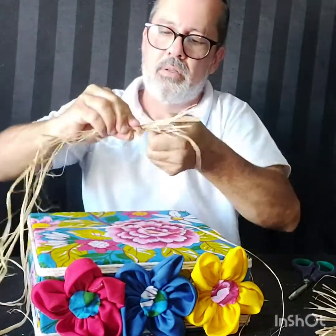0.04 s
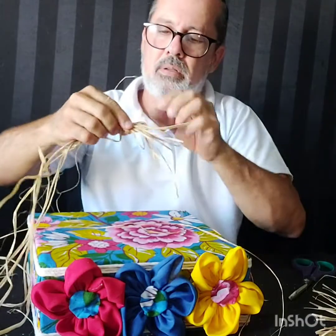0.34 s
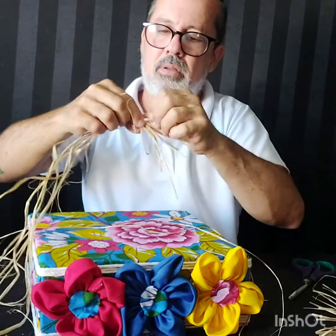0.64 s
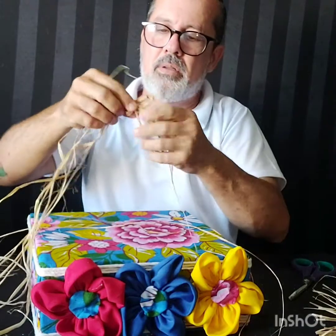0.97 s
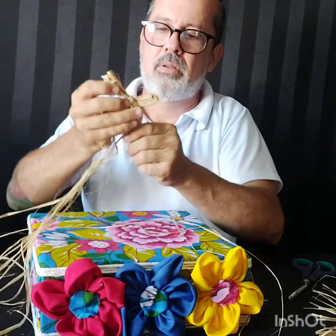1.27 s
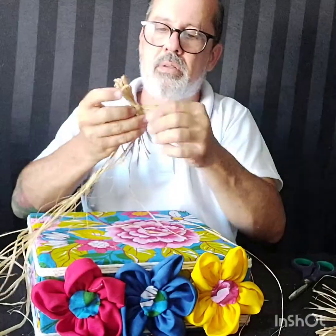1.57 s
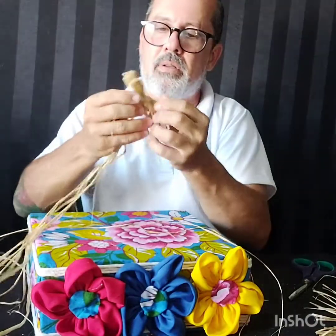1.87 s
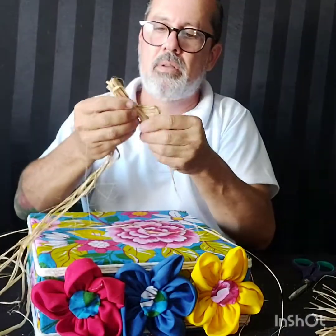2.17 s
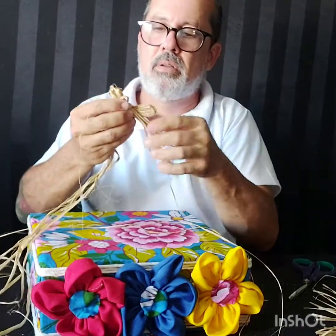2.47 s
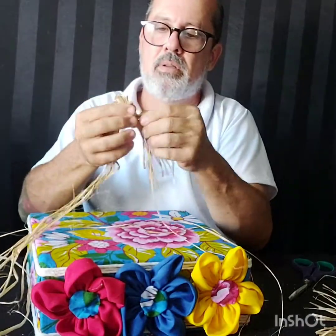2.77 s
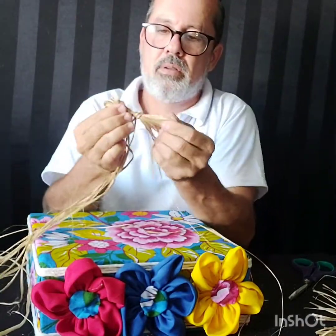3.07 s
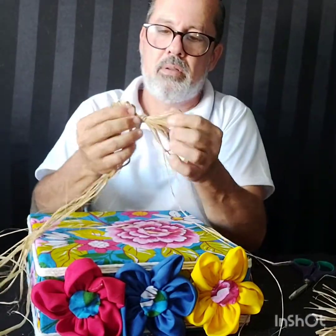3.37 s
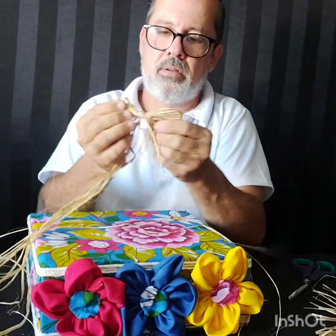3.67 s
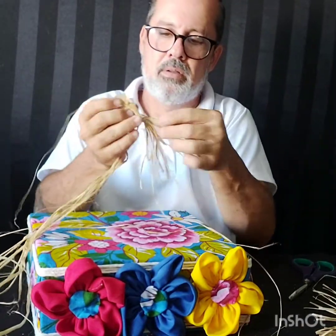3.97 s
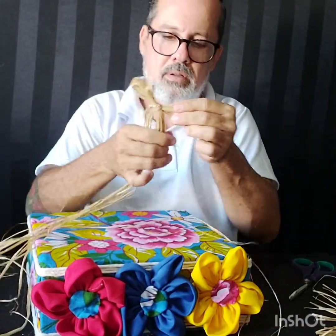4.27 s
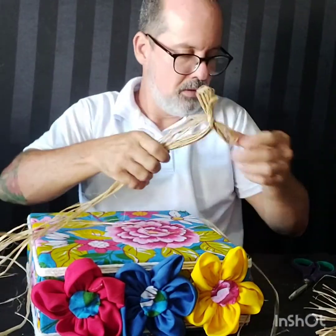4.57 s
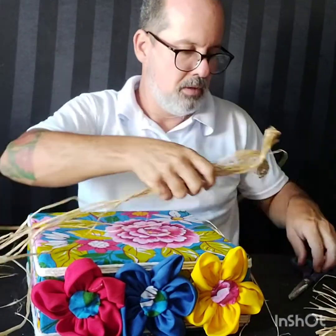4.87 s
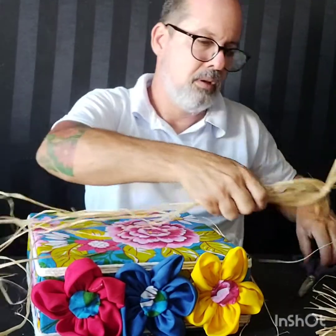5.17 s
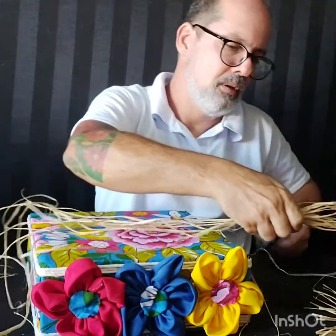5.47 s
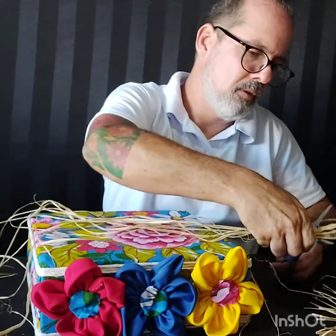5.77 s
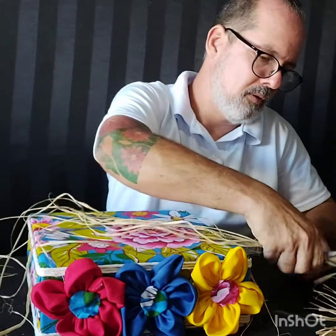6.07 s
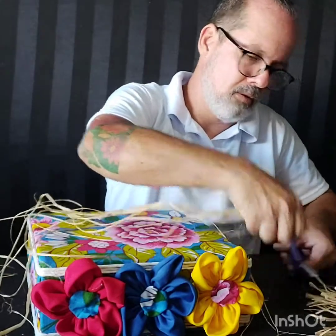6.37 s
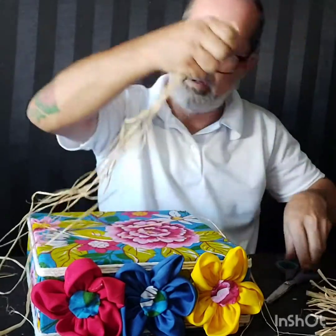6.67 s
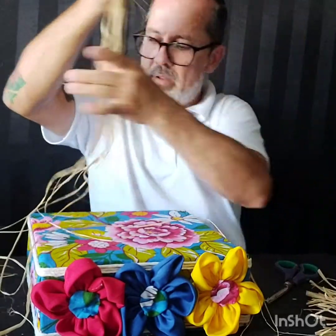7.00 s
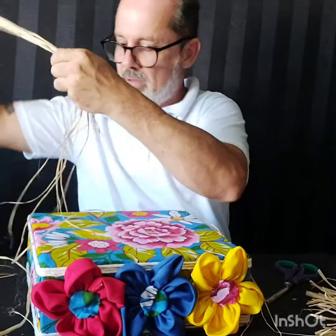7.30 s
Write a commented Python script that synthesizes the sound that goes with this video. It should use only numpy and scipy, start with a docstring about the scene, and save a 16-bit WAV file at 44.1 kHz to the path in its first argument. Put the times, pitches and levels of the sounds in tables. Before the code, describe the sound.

Hands work dry raffia close by in a quiet room, over a faint hiss and a steady low rumble of traffic outside. From the start, the fibres crinkle and rub in short, faint, irregular bursts, dotted with tiny high snaps. A distant engine swells softly around 1.3 seconds and again near 4.9, with a low street drone between about 3 and 4 seconds. Around 5 seconds, three soft knocks sound on the table and the bundle scrapes lightly across a box. At 6 seconds the snaps grow louder as scissors crunch through the fibres, clicking shut at 6.2. A dull thud follows at 6.4. At about 6.6 the scissors are put down hard, the loudest sound, and the table top rings briefly. Everything dips in level for a moment, then recovers as the raffia rustles again from 7 seconds to the end.

```python
"""A quiet room, traffic rumbling outside. Hands tie a small bow in dry raffia: fibres crinkle, rub, snap.
A far engine swells at 1.3 s and 4.85 s, a low street drone in between. Near 5 s: soft knocks on the
table, and the bundle scrapes across a box. At 6.2 s scissors crush through it and click shut.
At 6.6 s they are put down hard and the table top rings; the gain control ducks, then recovers."""
import sys
import numpy as np
from scipy import signal
from scipy.fft import rfft, irfft, next_fast_len
from scipy.io import wavfile
from scipy.ndimage import uniform_filter1d, minimum_filter1d, map_coordinates

SR = 44100
rng = np.random.default_rng(int(sys.argv[2]) if len(sys.argv) > 2 else 0)


def waveform_to_disk(signal):
    """Save audio, clipped to [-1, 1], as 16-bit WAV at the path in sys.argv[1]."""
    frames = np.transpose(np.atleast_2d(signal))
    scaled = np.clip(frames, -1, 1) * 32767
    samples = np.round(scaled).astype(np.int16)
    wavfile.write(sys.argv[1], SR, samples)


N = 323694

# noise spectra: f/Hz, relative density/dB
RUMBLE_SPECTRUM = [(20, -19), (35, -11.5), (50, 0.5), (75, 0.5), (130, -3), (200, -8), (300, -8.5),
                   (450, -16), (700, -22.5), (1250, -25), (1800, -38.5), (3200, -47.5), (8000, -52.5)]
HISS_SPECTRUM = [(300, 7.5), (700, 11.5), (1200, 9), (1700, -1), (2300, -0.5), (3200, -11), (5000, -9.5),
                 (8000, -5), (11000, 0), (16000, -4.5)]
CRINKLE_SPECTRUM = [(1000, -32.5), (3000, -30), (4500, -8.5), (8000, -5), (9300, -1), (11500, 1),
                    (14000, -1), (16000, -7)]
RUB_SPECTRUM = [(300, -10.5), (700, -2.5), (1500, -3.5), (2300, 0), (3100, -2), (4000, 4), (6500, -1),
                (9000, -6), (15000, -21.5)]
BOARD_SPECTRUM = [(100, -28), (250, -3), (500, 1), (800, -4), (1150, -4.5), (1500, -9.5), (2100, -10),
                  (3600, -13), (5000, -19.5), (7000, -31.5), (15000, -26.5)]  # dense, fast-dying table modes
SLIDE_SPECTRUM = [(80, -11), (250, 5), (500, -7.5), (900, -12.5), (1400, -12), (2200, -26), (4000, -17),
                  (5800, -14.5), (7500, -24), (11000, -31)]
CRUNCH_SPECTRUM = [(250, -13.5), (600, -4), (1100, -13.5), (1600, -6), (2200, 0.5), (3200, -1.5), (4800, 0),
                   (6500, 3), (7600, -3), (12000, 2), (16000, -6.5)]
# left-right likeness: f/Hz, correlation
STREET_CORR = [(60, 0.95), (220, 0.89), (430, 0.68), (700, -0.19), (1100, -0.57), (2200, 0.41), (4000, 0)]
NEAR_CORR = [(250, 1), (800, 0.36), (2000, 0.24), (6000, -0.2), (15000, 0.025)]
TABLE_CORR = [(130, 0.93), (300, 0.92), (640, 0.25), (1400, 0.011), (7000, 0)]
# finger strokes: start/s, hold/s, crinkle level/dB, rub re crinkle/dB
STROKES = [ (0.0, 0.037, -51.5, -10), (.15, .05, -59.5, -12), (0.204, 0.008, -54, -9),
           (.32, 0.13, -69, -7.5), (.485, 0.085, -55, -12), (.61, .11, -51, -12), (.80, .15, -63.5, -10),
           (.97, .05, -58, -13), (1.04, 0.19, -55.5, -9.5), (1.214, 0.068, -56, -6),
           (1.335, 0.085, -54.5, -10.5), (1.60, .17, -56, -15.5), (1.855, 0.062, -56.5, -11),
           (2.015, .075, -61, -7.5), (2.16, 0.21, -56, -12), (2.435, .035, -57.5, -9),
           (2.5, .08, -68.5, -2), (2.611, 0.021, -54, -7), (2.745, 0.06, -53, -13), (2.889, 0.038, -49, -7),
           (3.06, 0.076, -55, -9), (3.17, 0.19, -62, -15.5), (3.338, .015, -56.5, -9.5),
           (3.425, 0.028, -55, -12.5), (3.52, .055, -57.5, -9.5), (3.679, 0.056, -51.5, -10),
           (3.815, .022, -57, -10.5), (4.015, .185, -58.3, -13.5), (4.22, 0.048, -52.5, -10.5),
           (4.345, 0.14, -52.5, -9.5), (4.55, 0.15, -58.5, -8), (4.77, 0.21, -58, -11.5),
           (5.05, .18, -56.5, -6), (5.27, .02, -65, 4.5), (5.33, .32, -68, -12), (5.70, 0.13, -55.5, -13),
           (5.89, 0.079, -62, -15), (5.985, .13, -53.5, -11.5), (6.385, .025, -63.5, -21),
           (6.435, 0.028, -69.5, 6), (6.72, 0.13, -66, -13), (7.02, .1, -60, -19), (7.135, .05, -50, -17),
           (7.2, 0.15, -46.5, -11), ]
# loudest fibre snaps, in the fingers, then the blades: t/s, level/dB, f/Hz
SNAPS = [(.521, -44, 12300), (.607, -48, 10200), (1.146, -46, 11200), (1.223, -38, 11700),
         (1.265, -42.5, 11000), (1.752, -46.5, 11900), (2.738, -48, 10000), (3.333, -41.5, 12800),
         (4.003, -46.5, 11690), (4.774, -44, 12930), (5.229, -41.5, 11780), (5.327, -49, 11000),
         (5.977, -43, 12000), (6.057, -39, 9500), (6.079, -35, 11540), (6.116, -30.5, 11800),
         (6.146, -30.5, 10900), (6.18, -31, 9000), (6.351, -55, 10800)]
# engine swells: peak t/s, 10 dB fade either side/s, level/dB
ENGINE_SWELLS = [(1.3, 0.84, -56), (4.85, 0.57, -57)]
# street drone: t/s, f/Hz, level/dB
DRONE_TRACK = [(2.6, 50.4, -76), (2.95, 48.86, -47), (3.2, 47, -45.5), (3.42, 47.6, -48.5),
               (3.52, 69.9, -53.5), (3.75, 72.9, -47.5), (3.92, 69.1, -61.5), (4.4, 69, -70)]
# knocks on the table: t/s, level/dB, contact cutoff/Hz
KNOCKS = [(4.897, -39.5, 200), (4.997, -42.5, 310), (5.225, -47, 350), (6.4222, -23.5, 305),
          (6.643, -3, 3670), (6.65, -16, 2500)]
# table top modes: f/Hz, level/dB, t60/s
TABLE_MODES = [(97, -34, .6), (149.3, -13, 0.24), (241.6, -12, .09), (307, -1.5, 0.08), (342.6, 3.5, 0.029),
               (428.6, -9, .09), (479.4, -6, .1), (604, -17, 0.14), (633, -10.5, .1), (775, -14, .07),
               (830, -17, .07), (944, -16.5, .06), (1120, -14.5, 0.042), (1240, -15.5, 0.044),
               (1604, -24.5, .1), (1845, -23, .07), (2040, -18, .07), (2140, -20, 0.076),
               (2750, -30.5, 0.065), (3240, -31, 0.069), (3620, -27.5, .06)]
# room decay: f/Hz, t60/s
ROOM_T60 = [(90, 1), (170, .47), (300, 0.3), (700, 0.21), (2000, 0.15), (6000, .15), (14000, 0.21)]
# bundle sliding on the box: t/s, level/dB
DRAG_ENVELOPE = [(4.98, -81.5), (5.09, -65.5), (5.2, -57), (5.29, -54), (5.35, -70), (5.45, -91)]
# blades crushing the bundle: t/s, level/dB
CUT_ENVELOPE = [(6.02, -79.5), (6.11, -61), (6.165, -46.5), (6.192, -35), (6.212, -42.5), (6.25, -65),
                (6.3, -81)]
# blades meeting: t/s, level/dB
BLADE_CLICK = (6.1857, -18.5)
# microphone port colour: f/Hz, left minus right/dB
PORT_BALANCE = [(400, 0.3), (750, 3.5), (2400, 2.5), (4000, 1), (6400, -2.5), (8100, -4.5), (9200, 5.5),
                (11500, 4), (15000, -1)]


def amp(db):
    """dB to gain."""
    return 10 ** (np.asarray(db) / 20)


def unit(x):
    """Scale to rms 1."""
    return x / np.sqrt(np.mean(x ** 2) + 1e-20)


def along(points, hz):
    """Interpolate (f/Hz, value) points on a log axis."""
    knots_hz, values = np.transpose(points)
    return np.interp(np.log(hz + 1), np.log(knots_hz + 1), values)


def curves(rows):
    """Per-sample curve for each column after t/s."""
    knots_s, *columns = np.transpose(rows)
    return [np.interp(np.arange(N) / SR, knots_s, column) for column in columns]


def wobble(knots_per_s):
    """Smooth random curve."""
    knots = rng.standard_normal(int(N * knots_per_s / SR) + 4)
    spline = map_coordinates(knots, [np.arange(0, N + 16, 16) * knots_per_s / SR])
    return np.interp(np.arange(N), np.linspace(0, N, len(spline)), spline)


def filtered(x, response):
    """Apply the gain response(f/Hz)."""
    n = x.shape[-1]
    padded = next_fast_len(n + 8192)
    return irfft(rfft(x, padded) * response(np.fft.rfftfreq(padded, 1 / SR)), padded)[..., :n]


def add(track, start_s, sound):
    """Mix sound into track in place."""
    part = track[..., round(start_s * SR):][..., :sound.shape[-1]]
    part += sound[..., :part.shape[-1]]


def stereo(pair, spectrum, corr):
    """Two independent signals to coloured left and right, rms 1."""
    def mid_side_gains(hz):
        angle = np.arccos(np.clip(along(corr, hz), -1, 1)) / 2
        return amp(along(spectrum, hz)) * [np.cos(angle), np.sin(angle)]
    mid, side = filtered(pair, mid_side_gains)
    return unit(np.array([mid + side, mid - side]))


def noise(spectrum, corr, size=N):
    """Coloured stereo noise, rms 1."""
    return stereo(rng.standard_normal((2, size)), spectrum, corr)


def grains(spectrum, per_s, scatter_db):
    """Tiny fibre slips, random in time and size."""
    hits = rng.random(N) < per_s / SR
    sizes = amp(scatter_db * np.clip(rng.standard_normal(N), -2, 2))
    return stereo(hits * sizes * rng.standard_normal((2, N)), spectrum, NEAR_CORR)


def haze(x, spectrum, wet_db, t60_s):
    """Add the room's diffuse wash, following the power of x."""
    pole = amp(-60 / (t60_s * SR)) ** 2
    power = signal.lfilter([1 - pole], [1, -pole], np.mean(x ** 2, axis=0))
    return x + amp(wet_db) * np.sqrt(np.abs(power)) * noise(spectrum, NEAR_CORR)


def shifting(x, depth_db):
    """Colour shifts as different fibres take over."""
    bins = signal.stft(x, nperseg=256)[2]
    patches = uniform_filter1d(rng.standard_normal(bins.shape[1:]), size=8, axis=0)
    patches = uniform_filter1d(patches, size=12, axis=1)
    return signal.istft(bins * amp(depth_db * unit(patches)), nperseg=256)[1][:, :N]


def traffic(level_db=-53, sway_db=0.54):
    """Street rumble through the walls, swaying slightly."""
    return amp(level_db + sway_db * wobble(6)) * noise(RUMBLE_SPECTRUM, STREET_CORR)


def hush(level_db=-67.5):
    """Steady room hiss."""
    return amp(level_db) * noise(HISS_SPECTRUM, STREET_CORR)


def raffia(grip_db=-80, attack_s=0.055, release_s=0.11):
    """Bending fibres crinkle in clumps; sliding strands rub more dully."""
    t = np.arange(N) / SR
    crinkle_db = rub_db = np.full(N, grip_db)  # held fibres never lie quite still
    for start_s, hold_s, db, rub_offset_db in STROKES:
        before_s, after_s = np.maximum(start_s - t, 0), np.maximum(t - start_s - hold_s, 0)
        stroke_db = db - 20 * (before_s / attack_s + after_s / release_s)
        crinkle_db = np.maximum(crinkle_db, stroke_db)
        rub_db = np.maximum(rub_db, stroke_db + rub_offset_db)
    clumps = amp(0.95 * wobble(60) + 1.6 * wobble(300))
    dense = grains(CRINKLE_SPECTRUM, per_s=3500, scatter_db=2.0)
    sparse = amp(-6) * grains(CRINKLE_SPECTRUM, per_s=150, scatter_db=3.5)
    crinkle = haze(clumps * (dense + sparse), CRINKLE_SPECTRUM, wet_db=2.5, t60_s=0.1)
    crinkle = unit(shifting(crinkle, depth_db=1.5))
    friction = grains(RUB_SPECTRUM, per_s=3500, scatter_db=1.0)
    rub = haze(clumps * friction, RUB_SPECTRUM, wet_db=0.5, t60_s=0.13)
    rub = unit(shifting(rub, depth_db=3.0))
    return amp(crinkle_db) * crinkle + amp(rub_db) * rub


def snaps(ticks_per_s=4, tick_over_stroke_db=2, tick_hz=11500, t60_s=0.012):
    """Fibres splinter, each around its own pitch; longer strokes more often add a random tick."""
    out, t = np.zeros((2, N)), np.arange(1024) / SR
    ticks = []
    for start_s, hold_s, db, _ in STROKES:
        chance, when, pitch = rng.random(3)
        if chance < ticks_per_s * hold_s:
            hz = tick_hz * 2 ** ((pitch - 0.5) / 2)
            ticks.append((start_s + when * hold_s, db + tick_over_stroke_db, hz))
    for start_s, db, hz in SNAPS + ticks:
        spectrum = [(hz / 8, -28), (hz / 2, -12), (hz, 0), (2 * hz, -11)]
        add(out, start_s, amp(db - 60 * t / t60_s) * noise(spectrum, NEAR_CORR, len(t)))
    return haze(out, CRINKLE_SPECTRUM, wet_db=-2.5, t60_s=0.17)


def engine():
    """Far engine: a narrow band of low noise, swelling twice."""
    t = np.arange(N) / SR
    swells = sum(amp(db - 10 * ((t - peak_s) / fade_s) ** 2) for peak_s, fade_s, db in ENGINE_SWELLS)
    hum_spectrum = [(80, -37), (110, -1.0), (135, -2.5), (180, -38), (500, -92.5)]
    return swells * noise(hum_spectrum, STREET_CORR)


def drone(sway_db=1.5):
    """Low gliding tone from the street."""
    hz, db = curves(DRONE_TRACK)
    tone = np.sqrt(2) * np.sin(2 * np.pi * np.cumsum(hz) / SR)
    return amp(db + sway_db * wobble(10)) * tone


def table_knocks(board_t60_s=0.063, crack_t60_s=0.088, radiation_hz=122):
    """Each knock rings the top; soft contact leaves out the high modes."""
    out, t = np.zeros((2, N)), np.arange(SR // 2) / SR
    ring = np.zeros(len(t))
    for k, (hz, db, t60_s) in enumerate(TABLE_MODES):
        sign = 1 if k < 5 else (-1) ** k
        ring += sign * amp(db - 60 * t / t60_s) * np.sin(2 * np.pi * hz * t)
    for start_s, db, contact_hz in KNOCKS:
        board = amp(-3.5 - 60 * t / board_t60_s) * noise(BOARD_SPECTRUM, TABLE_CORR, len(t))
        contact = signal.butter(3, contact_hz, fs=SR)
        thud = signal.lfilter(*contact, board - ring)
        # hard steel on wood adds a thin crack
        crack = amp(-28 - 60 * t / crack_t60_s) * noise(CRUNCH_SPECTRUM, NEAR_CORR, len(t))
        add(out, start_s, amp(db) * (thud + (contact_hz / 4000) ** 2 * crack))
    # air slips round the top: deep bass is not radiated
    return signal.lfilter(*signal.butter(3, radiation_hz, "high", fs=SR), out)


def room(x, tail_db=-12.5, wall_db=-4.5, wall_delay_s=0.0195, wall_cutoff_hz=795):
    """Add a dull echo off the facing wall and a tail, longest in the bass."""
    white = noise([(20, 0), (20000, 0)], TABLE_CORR, size=SR)
    hz, t, bins = signal.stft(white, SR, nperseg=256)
    decay = amp(-60 * t / along(ROOM_T60, hz)[:, None])
    impulse = signal.istft(bins * decay, SR, nperseg=256)[1]
    tail = signal.fftconvolve(x, impulse / np.linalg.norm(impulse[0]), axes=1)[:, :N]
    echo = signal.lfilter(*signal.butter(1, wall_cutoff_hz, fs=SR), x)
    out = x.copy()
    add(out, wall_delay_s, amp(wall_db) * echo + amp(tail_db) * tail)
    return out


def drag():
    """The bundle scrapes across the box lid."""
    return amp(curves(DRAG_ENVELOPE)[0]) * grains(SLIDE_SPECTRUM, per_s=3800, scatter_db=1.5)


def scissors(click_t60_s=0.0057):
    """Blades crush many fibres, then click shut."""
    out = amp(curves(CUT_ENVELOPE)[0]) * grains(CRUNCH_SPECTRUM, per_s=12000, scatter_db=2.0)
    click_s, click_db = BLADE_CLICK
    t = np.arange(1024) / SR
    click = amp(click_db - 60 * t / click_t60_s) * noise(CRUNCH_SPECTRUM, NEAR_CORR, len(t))
    add(out, click_s, click)
    return haze(out, CRUNCH_SPECTRUM, wet_db=-10, t60_s=0.18)


def gain_control(x, ceiling_db, hold_s, release_db_per_s):
    """Level over the ceiling cuts the gain at once; it holds, then creeps back."""
    power = np.abs(uniform_filter1d(np.mean(x ** 2, axis=0), size=1024))
    need_db = np.minimum(0, ceiling_db - 10 * np.log10(power + 1e-18))
    need_db = minimum_filter1d(need_db, size=1024)
    window = int(hold_s * SR) + 1
    held_db = minimum_filter1d(need_db, window, origin=(window - 1) // 2, mode="nearest")
    climb_db = release_db_per_s * np.arange(N) / SR
    gain_db = np.minimum.accumulate(held_db - climb_db) + climb_db
    return x * amp(uniform_filter1d(gain_db, size=64))


def scene():
    """Handwork at the table over street and room noise."""
    handwork = raffia() + snaps() + scissors() + drag() + room(table_knocks())
    return handwork + traffic() + drone() + engine() + hush()


def record(dry):
    """Two microphone ports, gain control, band limit."""
    heard = filtered(dry, lambda hz: amp(along(PORT_BALANCE, hz) * [[0.5], [-0.5]]))
    ducked = gain_control(heard, ceiling_db=-12.0, hold_s=0.36, release_db_per_s=21.6)
    top_hz, edge_hz = 15850, 200
    return filtered(ducked, lambda hz: np.clip((top_hz - hz) / edge_hz + 0.5, 0, 1))


dry = scene()
out = record(dry)
waveform_to_disk(out)
```